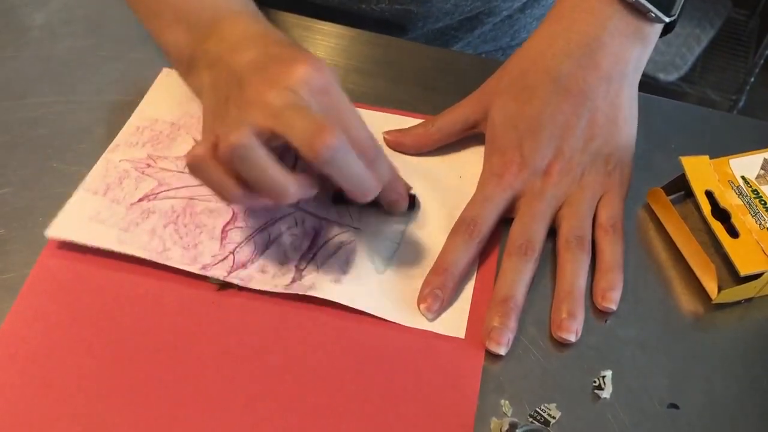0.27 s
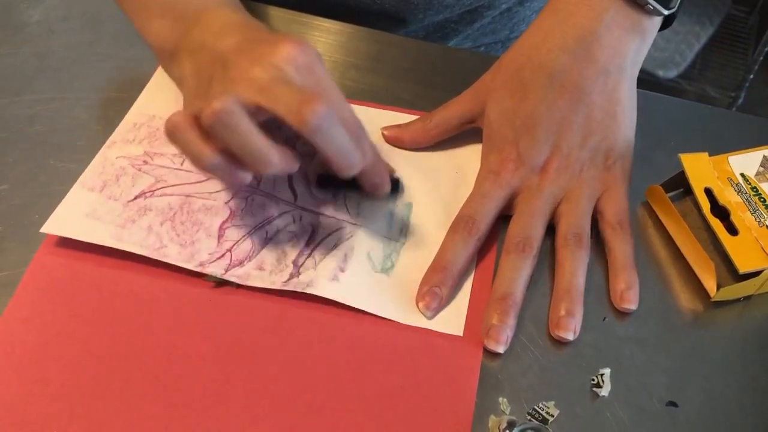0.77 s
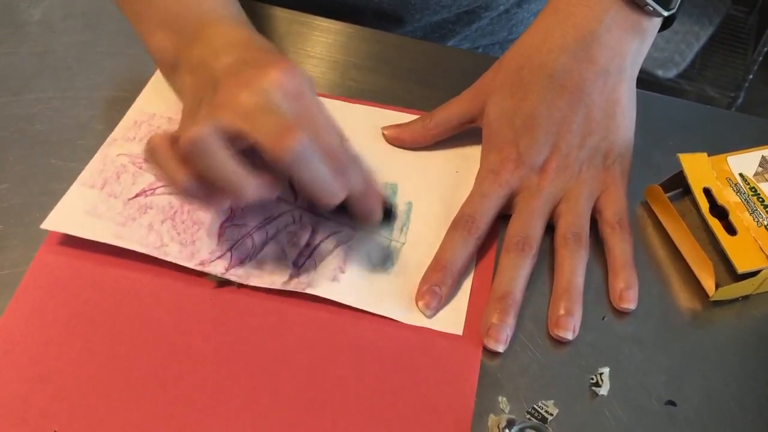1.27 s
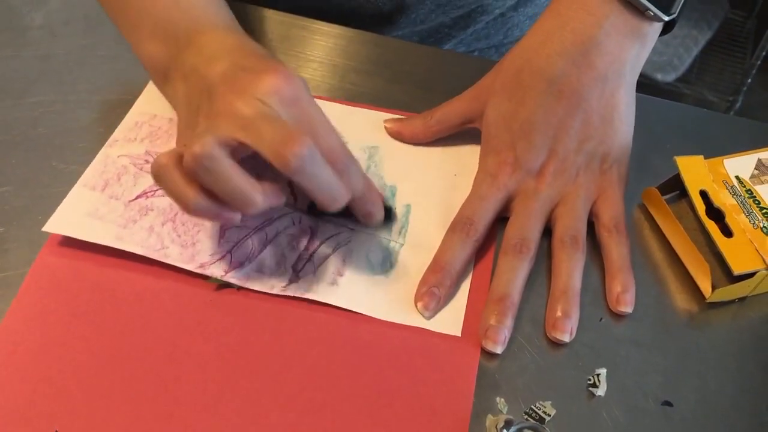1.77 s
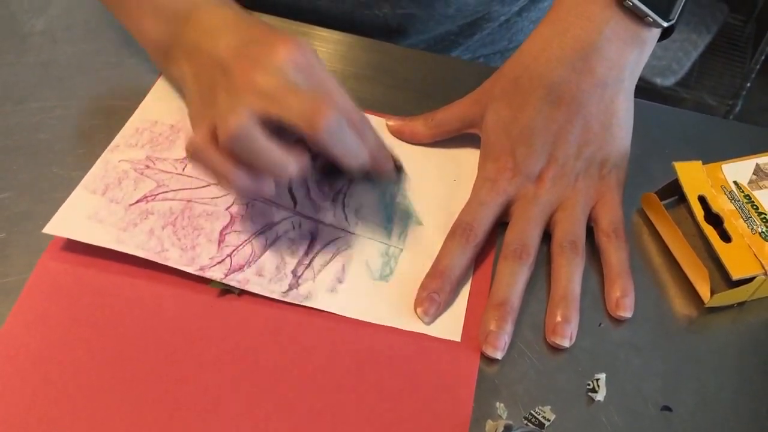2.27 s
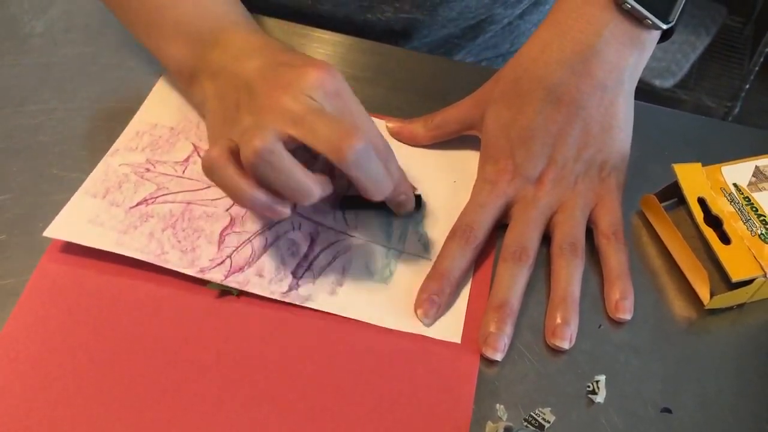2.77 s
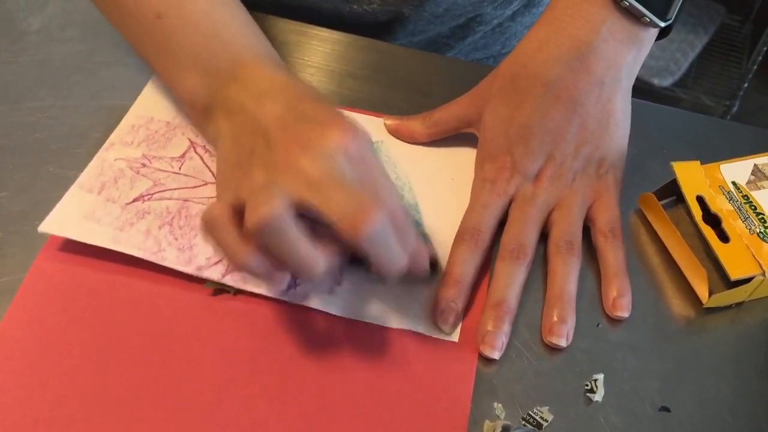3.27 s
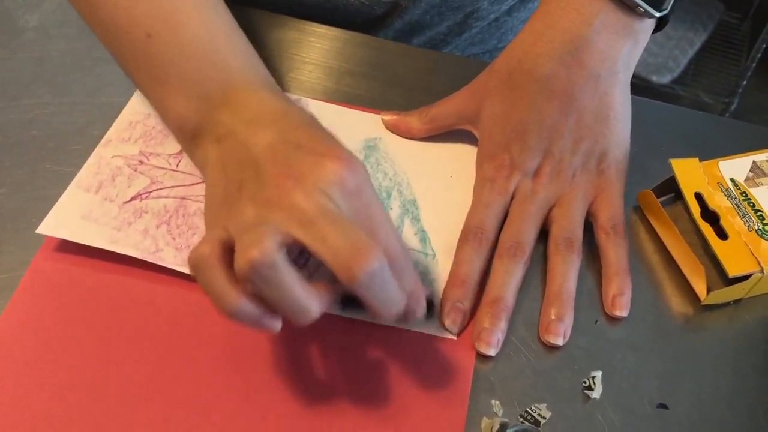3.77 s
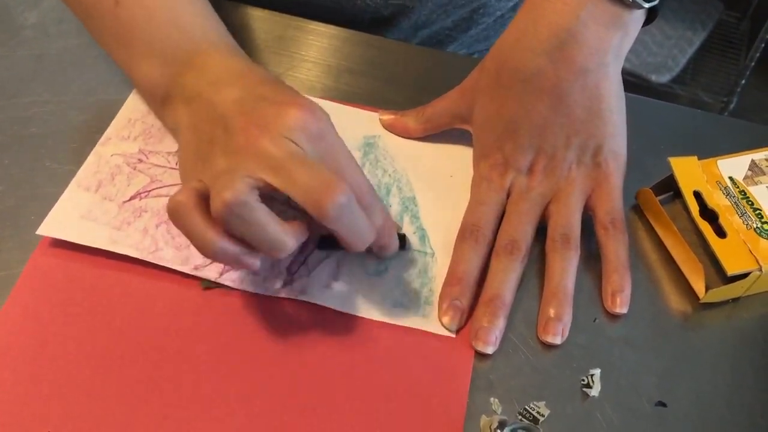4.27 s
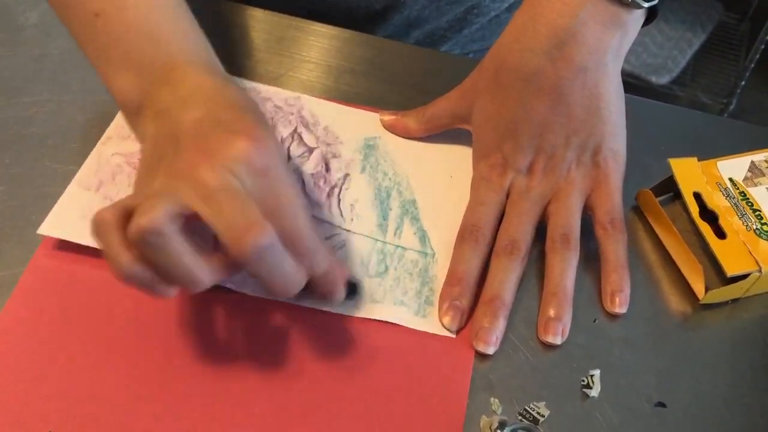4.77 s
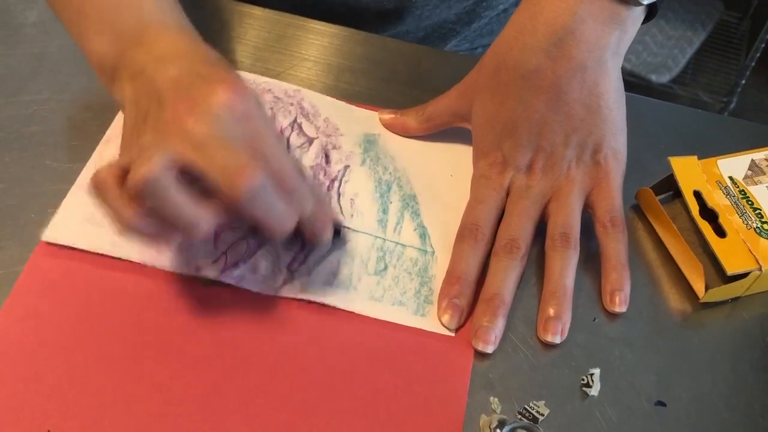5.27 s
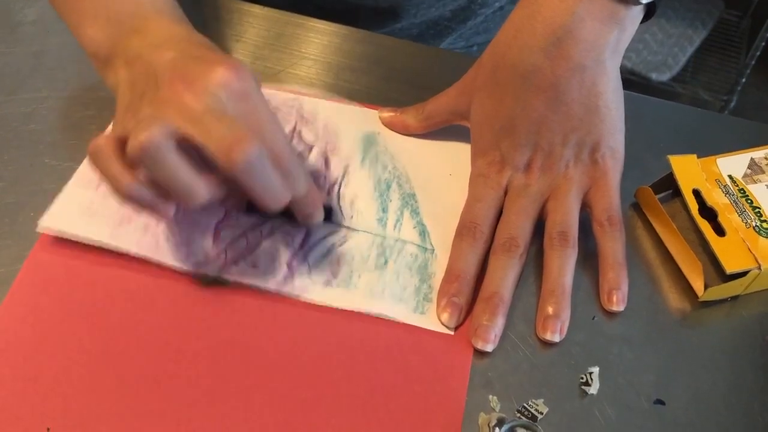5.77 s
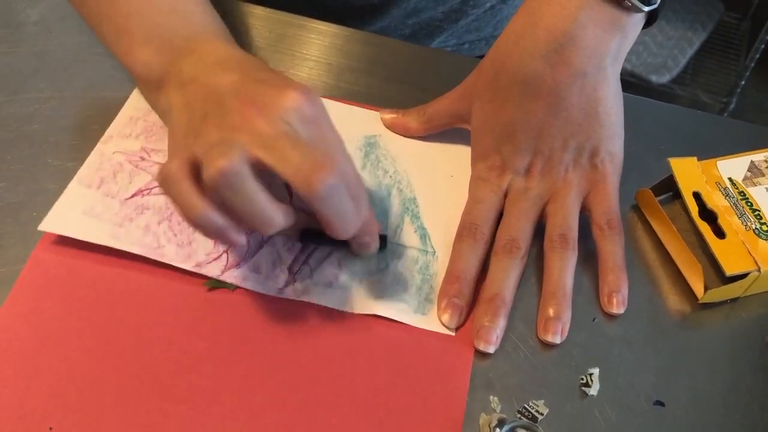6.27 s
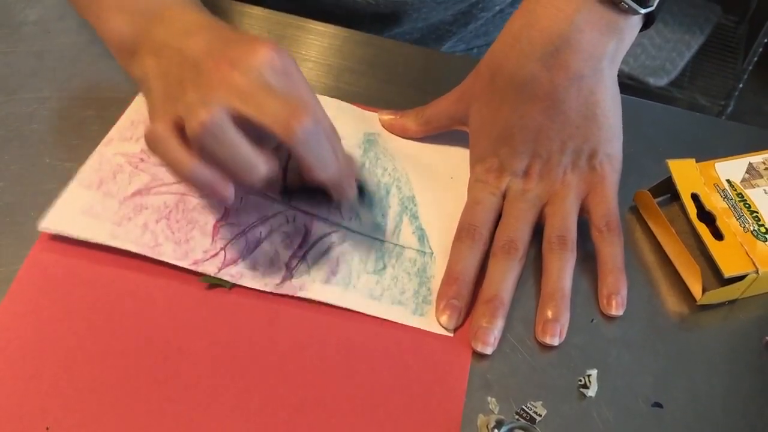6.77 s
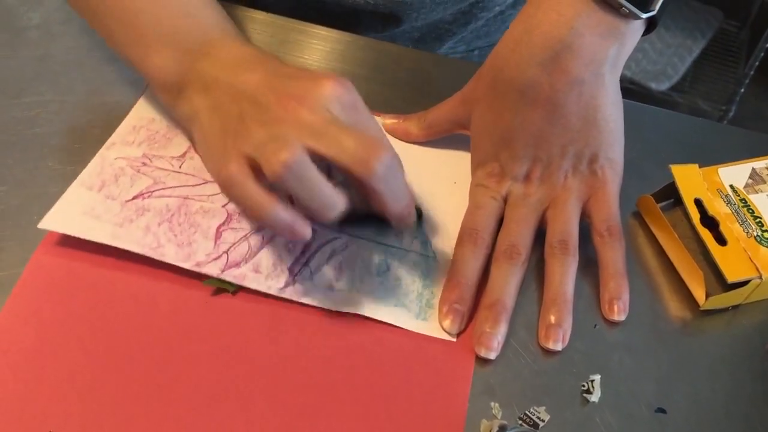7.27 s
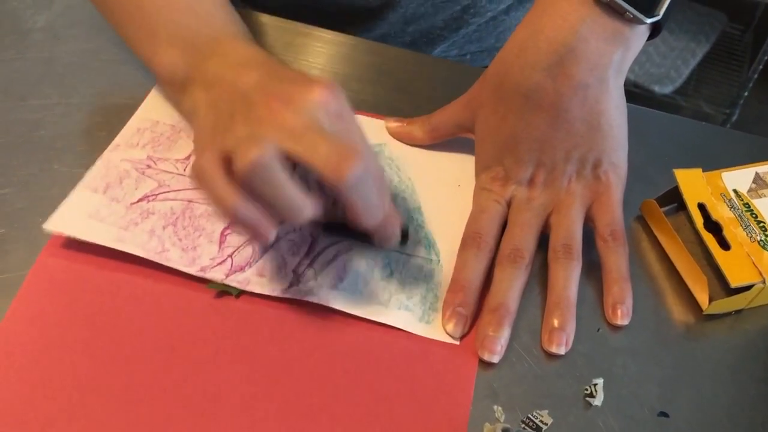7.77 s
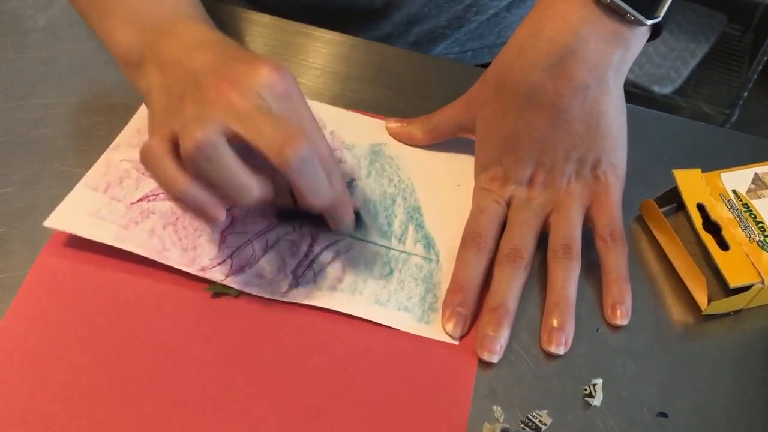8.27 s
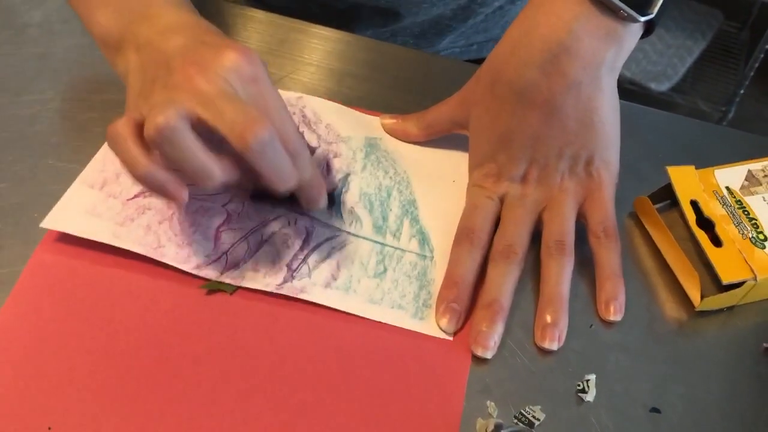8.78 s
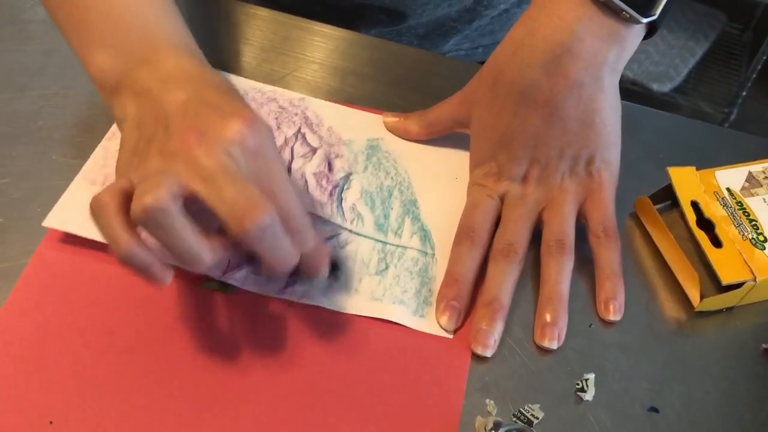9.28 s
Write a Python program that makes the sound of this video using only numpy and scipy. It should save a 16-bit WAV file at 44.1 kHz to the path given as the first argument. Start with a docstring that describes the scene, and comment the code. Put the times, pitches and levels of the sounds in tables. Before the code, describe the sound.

Close up in a small room, a wax crayon rubs rapidly to and fro over paper, about five dry, bright strokes a second. The first strokes are hardest, with hissing skids, sharp snaps and soft knocks of the sheet on the table. Rubbing then turns lighter and finer, firms up again midway, and continues to the end over a constant low electrical hum and faint ventilation rush.

```python
"""A small room with a table: a wax crayon rubs to and fro over a sheet of paper that lies on a leaf.
Fine noise grains through the sheet's colour make the rasp, skids, scuffs and rib ticks; sharp slips snap.
Decaying low modes make the knocks of the sheet on the table, and shaped noise the swish of the hand.
Behind it, wavering sines make a mains hum and fan tones, and coloured noise the low rush of the room."""
import sys
import numpy as np
from scipy import signal
from scipy.fft import rfft, irfft
from scipy.io import wavfile
from scipy.ndimage import uniform_filter1d

SR = 44100
rng = np.random.default_rng(int(sys.argv[2]) if len(sys.argv) > 2 else 0)


def transcribe(u):
    """Save the signal u as a 16-bit wav file named by the first command-line argument.

    u: samples, shape (n,) or (channels, n), limited to [-1, 1]; the rate is SR.
    q: integer samples, one column per channel.
    """
    v = np.clip(np.atleast_2d(u).T, -1, 1)
    q = np.round(v * 32767).astype(np.int16)
    wavfile.write(sys.argv[1], SR, q)


N = 420713
TIME = np.arange(N) / SR
USUAL_DB = -49  # pressure of a usual stroke
EDGE_HZ = 15850  # upper limit of the band


def amp(db):
    """Turns decibels into a gain."""
    return 10 ** (np.asarray(db) / 20)


def evened(x):
    """Scales to rms 1."""
    return x / np.sqrt(np.mean(x ** 2) + 1e-20)


def read(points, hz):
    """Reads a table on a logarithmic frequency axis."""
    f, value = np.transpose(points)
    return np.interp(np.log(hz + 1), np.log(f + 1), value)


def add(mix, s, sound):
    """Mixes a sound in at time s."""
    part = mix[max(round(s * SR), 0):][:len(sound)]
    part += sound[:len(part)]


def drift(hz, count):
    """Slow chance of rms 1 with changes up to about hz."""
    f = np.fft.rfftfreq(count, 1 / SR)
    noise = rfft(rng.standard_normal(count))
    return evened(irfft(noise / (1 + (f / hz) ** 4), count))


def grains(count, per_s, spread_db):
    """Tiny slips of wax on fibres, at random instants; a wider spread makes a few much larger."""
    sizes = amp(spread_db * np.minimum(rng.exponential(1, count), 4.5))
    signed = sizes * rng.standard_normal(count)
    return signed * (rng.random(count) < per_s / SR)


# how a lift of the body or the sheen spreads over the spectrum: [f/Hz, share of the lift]
BODY_LIFT = [(1200, 1.9), (2600, 0.57), (3700, 1.5), (4600, 0), (6000, 0)]
SHEEN_LIFT = [(6500, 0), (11000, 1.06), (15500, 1.03)]


def ring(spectrum, body_db=0, sheen_db=0, size=2048):
    """Causal response of the paper to one click, of energy 1 before body and sheen are lifted."""
    hz = abs(np.fft.fftfreq(size, 1 / SR))
    lift_db = body_db * read(BODY_LIFT, hz) + sheen_db * read(SHEEN_LIFT, hz)
    log_gain = np.log(evened(amp(read(spectrum, hz))) * amp(lift_db))
    minimum_phase = np.exp(np.conj(signal.hilbert(log_gain)))
    return np.fft.ifft(minimum_phase).real[:size // 2]


# colour of the rush of ventilation: [f/Hz, relative level/dB per Hz]
AIR_COLOUR = [(25, -33), (45, -20), (60, -3), (72, -11), (92, 0), (112, -15), (140, -4), (172, 5),
              (205, -4.5), (235, -1), (330, -9.5), (450, -10.5), (700, -13.5), (1400, -20.5), (2200, -23.5),
              (2800, -31.5), (3800, -28.5), (7000, -34.5), (15500, -39)]
# mains hum and fan tones: [f/Hz, rms level/dB before the waver]
HUM_TONES = [(119.9, -51), (175, -80), (233, -68.5), (359.7, -74.5), (407, -78), (443, -77.5), (462, -75),
             (599.6, -78)]


def background(air_db=-57.5, waver_db=0.4, fan_waver=1.0):
    """A mains hum steady in pitch; weaker tones and a swelling fan drone wander in the rush of ventilation."""
    drone_hz, drone_db = 59, -75
    swell_db, swell_s, first_crest_s = 5.5, 3.08, 1.54
    hz = np.fft.rfftfreq(N, 1 / SR)
    rush = irfft(rfft(rng.standard_normal(N)) * amp(read(AIR_COLOUR, hz)), N)
    out = amp(air_db) * evened(rush)
    sway, wander = drift(3.5, N), drift(1.13, N)
    strongest_db = max(db for _, db in HUM_TONES)
    for f, db in HUM_TONES:
        shift = rng.integers(N)  # each tone wavers on its own
        phase = 2 * np.pi * (f * TIME + rng.random())
        phase += fan_waver * np.roll(wander, shift) * (db < strongest_db)  # the strongest holds its pitch
        out += np.sqrt(2) * amp(db + waver_db * np.roll(sway, shift)) * np.sin(phase)
    swell = amp(drone_db + swell_db * np.cos(2 * np.pi * (TIME - first_crest_s) / swell_s))
    drone = np.sin(2 * np.pi * drone_hz * TIME + fan_waver * wander)
    return out + np.sqrt(2) * swell * drone


# the wax breaks loose and skids: [t/s start, length/s before the release, level/dB of the grains before shaping]
SKIDS = [(0, 0.07, -65.5), (0.208, 0.038, -42), (0.336, .02, -40), (0.359, 0.041, -33), (0.387, 0.021, -30),
         (0.628, 0.0083, -38.5), (0.867, 0.015, -38.5), (1.613, 0.031, -48), (2.54, 0.062, -42.5),
         (2.882, 0.043, -44.5), (3.111, 0.016, -45.5), (3.2335, 0.0075, -29), (5.389, 0.01, -45.5),
         (5.782, 0.0093, -43), (7.009, 0.031, -50.5), (7.292, 0.042, -48), (7.751, 0.022, -49),
         (8.135, 0.045, -47)]
# bright colour of a skid, which barely moves the sheet: [f/Hz, relative level/dB per Hz]
SKID_COLOUR = [(150, -30), (1500, -19), (3000, -13), (4400, -8), (5200, 3.5), (6800, 5.5), (8400, -2),
               (11000, 2), (15500, -8)]


def skids(attack_s=.0012, release_s=0.0085):
    """Sudden runs of fine, fast slips that hiss brightly."""
    out, hiss = np.zeros(N), ring(SKID_COLOUR)
    for s, length_s, db in SKIDS:
        t = np.arange(0, length_s + 2 * release_s, 1 / SR)
        shape = np.interp(t, [0, attack_s, length_s, t[-1]], [0, 0.84, 0.5, 0.0])
        slips = grains(len(t), per_s=6800, spread_db=4.0) * shape
        add(out, s, amp(db) * signal.fftconvolve(slips, hiss))
    return out


# strokes, to and fro in turn, each lasting until the next:
# [t/s start before the rest, pressure as level/dB, place of the peak 0-1 before limits, sheen as level/dB]
STROKES = [(0.094, -45, 0.55, 3.0), (0.293, -39, 0.25, -4), (0.523, -51, 0.41, 0), (0.749, -42.5, 0.49, -1),
           (0.948, -52, 0.41, 1), (1.163, -45.5, 0.41, -2.5), (1.354, -55, 0.29, 5.5),
           (1.537, -50, 0.81, 3), (1.749, -60.5, 0.37, 2.5), (1.947, -49.5, 0.79, 2.5),
           (2.146, -60, 0.4, 2), (2.368, -47.5, 0.97, 2), (2.654, -53.5, 0.11, -0.5),
           (2.811, -53.5, 0.52, 2.0), (3.01, -53, 0.7, 2.5), (3.173, -52.5, 0.33, 6.0),
           (3.392, -60.5, 0.88, 2.5), (3.554, -57.5, 0.41, 10.5), (3.724, -63.5, 0.8, 4),
           (3.919, -59.5, 0.5, 10.5), (4.079, -57, 0.82, 1), (4.265, -57, 0.5, 7.5),
           (4.431, -48.5, 0.88, -0.5), (4.638, -49, 0.24, 5.5), (4.814, -55, 0.63, 0.5),
           (4.991, -52, 0.3, 3), (5.16, -49.5, 0.78, -4), (5.353, -46.5, 0.29, 1.5), (5.534, -52, 0.56, -6),
           (5.753, -53, 0.26, -0.5), (5.921, -55.5, 0.24, 1), (6.099, -49, 0.38, -1.5),
           (6.283, -50, 0.3, 1), (6.461, -45.5, 0.45, -0.5), (6.679, -52, 0.21, -1.5),
           (6.878, -53.5, 0.41, -3.5), (7.12, -57.5, 0.06, 3), (7.24, -52, 0.57, 0.5),
           (7.392, -55.5, 0.35, 0.0), (7.621, -51.5, 0.74, 1), (7.815, -56.5, 0.35, 2),
           (8.04, -50, 0.61, 1.5), (8.235, -54, 0.38, 0.5), (8.451, -50.0, 0.62, -0.5),
           (8.68, -51.5, 0.43, -6), (8.832, -52.5, 0.34, 1.5), (9.07, -57, 0.6, 2.5),
           (9.222, -58, 0.33, 5.5), (9.371, -51, 0.9, -4)]


def strokes():
    """Yields each stroke: start, pressure in dB over time, and motion (0 at the turns, 1 between)."""
    rise_db, fall_db, arch_power = 21, 26.5, 1.606  # slopes of a usual stroke's rounded arch
    peaking = 0.5  # strokes harder than usual swell more steeply
    # the hand rests longer before a late peak; the wax grips at once and slows into the turn
    rest_s, grip_s, turn_s = 0.043, 0.0077, 0.044
    ends = [row[0] for row in STROKES[1:]] + [N / SR + grip_s]
    for (start, db, peak, _), end in zip(STROKES, ends):
        peak = np.clip(peak, .05, .95)
        start += rest_s * peak ** 2
        t = np.arange(0, end - start, 1 / SR)
        past = t / t[-1] - peak
        slope_db = np.where(past < 0, rise_db / peak ** arch_power, fall_db)
        slack_db = slope_db * abs(past) ** arch_power
        moving = np.clip(np.minimum(t / grip_s, (t[-1] - t) / turn_s), 0, 1)
        yield start, db - slack_db * amp(peaking * (db - USUAL_DB)), moving


# colour of the paper's tooth under the wax: [f/Hz, relative level/dB per Hz]
RASP_COLOUR = [(150, -11.5), (500, -15.5), (1100, -18), (1650, -9), (1880, -7.5), (2500, -6), (3600, -1),
               (4400, -2), (5100, 2), (5700, -1.5), (6300, 1.5), (8400, -4), (10900, -4), (13000, -7),
               (15500, -7)]


def rubbing(chatter_db=2.1, chatter_hz=120, uneven_db=0.75, uneven_hz=25, grit_db=-15,
            treble_follow=0.02, body_db=1.0, light_body=0.11, level_db=-0.34):
    """The tooth of the paper rasps under the wax; light strokes have more body, and treble follows pressure."""
    out = np.zeros(N)
    treble = signal.butter(1, 8000, "high", fs=SR)
    for (start, force_db, moving), (_, peak_db, _, sheen_db) in zip(strokes(), STROKES):
        count = len(force_db)
        slips = grains(count, per_s=30000, spread_db=2.3) * amp(chatter_db * drift(chatter_hz, count))
        slips += amp(grit_db) * grains(count, per_s=360, spread_db=-3.0)  # crumbs of wax catch now and then
        sheet = ring(RASP_COLOUR, body_db + light_body * (USUAL_DB - peak_db), sheen_db)
        rasp = signal.fftconvolve(slips, sheet)[:count]
        treble_change = amp(treble_follow * (force_db - peak_db)) - 1
        rasp = rasp + treble_change * signal.lfilter(*treble, rasp)
        uneven = uneven_db * drift(uneven_hz, count)
        add(out, start, rasp * moving * amp(force_db + level_db + uneven))
    return out


# the side of the hand bears down on the sheet: [t/s centre, level/dB before the trim, half length/s]
BRUSHES = [(1.48, -62, 0.027), (1.886, -61, 0.026), (2.273, -61.5, 0.034), (2.487, -65, 0.066),
           (2.743, -58.5, .015), (3.606, -64.5, 0.027), (3.966, -61.5, 0.01), (5.27, -60, 0.024),
           (6.245, -57, 0.012), (9.193, -57, 0.011), (9.253, -58, 0.0098)]


def brushes(glide_db=-69, narrow=3.2, trim_db=-1):
    """Skin slides on paper with a dull swish: lightly in mid-stroke, louder where the hand bears down."""
    force = sum(amp(db) * np.exp(-((TIME - s) / half_s) ** 2 / 2) for s, db, half_s in BRUSHES)
    for start, _, moving in strokes():
        glide = abs(np.sin(np.linspace(0, np.pi, len(moving)))) ** narrow
        add(force, start, amp(glide_db) * glide)
    skin = ring([(200, -10), (700, -1.5), (1300, 8.5), (2100, -0.5), (3000, -4.0), (8000, -8)])
    return amp(trim_db) * signal.oaconvolve(force * rng.standard_normal(N), skin)[:N]


def ribs(per_s=60, spread_db=-0.5, follow=0.64, dull_db=-68, sharp_db=-64):
    """The fine ribs of the leaf pass at random under the moving crayon, each a small hollow tick."""
    force = np.zeros(N)
    for start, force_db, moving in strokes():
        add(force, start, moving * amp(follow * (force_db - USUAL_DB)))
    tick = amp(dull_db) * ring(SCUFF_COLOUR) + amp(sharp_db) * ring(SNAP_COLOUR)
    return signal.oaconvolve(force * grains(N, per_s, spread_db), tick)[:N]


# the crayon crosses a vein and the loose sheet rattles: [t/s centre, level/dB before the trim, half length/s]
SCUFFS = [(0.215, -51, 0.011), (0.3724, -39, 0.00144), (0.422, -43.5, 0.0058), (0.633, -50, 0.0088),
          (0.854, -43, 0.0036), (.908, -46, 0.0035), (1.015, -41.5, 0.0025), (1.043, -45, 0.0089),
          (2.574, -49, 0.0039), (2.646, -50, 0.0018), (2.693, -53, 0.0043), (2.911, -42.5, 0.0023),
          (2.931, -52, 0.0048), (3.099, -56, 0.0072), (3.272, -45.5, 0.0072), (4.227, -48, 0.0031),
          (4.304, -48.5, 0.0023), (4.701, -49.5, 0.0095), (5.068, -53.5, 0.0027), (5.416, -47, 0.0046),
          (5.795, -48, 0.0056), (5.995, -52, 0.0034), (6.348, -49.5, .009), (6.604, -39.5, 0.0017),
          (6.681, -52.5, 0.0028), (6.734, -48.5, .011), (7.123, -51, 0.0037), (7.347, -45.5, 0.0021),
          (7.456, -58, 0.005), (8.569, -60, 0.0043), (8.623, -51, 0.004), (8.758, -48, 0.0041),
          (8.912, -43.5, 0.0026), (8.933, -52.5, 0.0051)]
# hollow colour of the loose sheet: [f/Hz, relative level/dB per Hz]
SCUFF_COLOUR = [(100, -28), (300, -1.5), (600, -3), (1000, -2), (1500, -3.5), (2000, -2), (3200, -4.5),
                (6000, -8.5), (15000, -64)]


def scuffs(trim_db=2.5):
    """Short clumps of coarse slips with the hollow colour of the loose sheet."""
    out = np.zeros(N)
    for s, db, half_s in SCUFFS:
        t = np.arange(-2 * half_s, 2 * half_s, 1 / SR)
        slips = evened(grains(len(t), per_s=7000, spread_db=2.5))
        clump = slips * np.exp(-(t / half_s) ** 2 / 2)
        add(out, s + t[0], amp(db + trim_db) * signal.fftconvolve(clump, ring(SCUFF_COLOUR)))
    return out


# the sheet is knocked down on the table: [t/s, peak level/dB, lift of the lowest modes as level/dB]
THUDS = [(.206, -43, 0), (0.426, -32.5, -7), (0.634, -38, -8), (.911, -37.5, -1), (1.039, -41.5, -1),
         (2.943, -43.5, 5), (3.276, -37, 4), (3.119, -46, -1), (4.307, -39.5, 2), (4.707, -39, 5),
         (5.031, -48, 16), (5.300, -47, 10), (5.421, -36, 1), (5.81, -51, 18), (6.341, -41.5, -17),
         (8.945, -40.5, 2)]
# modes of the sheet on the table: [f/Hz before detuning, relative level/dB, t60/s]
TABLE_MODES = [(87, -24, 0.35), (168, -17.5, 0.19), (186.3, -17, 0.12), (208.3, -5.5, 0.047),
               (274, -17.5, 0.069), (443, -19.5, 0.047)]


def thuds(stiffen=2.08, settle_s=0.001, scatter=0.068):
    """Low modes ring; bending waves bring the higher pitch first, so each thud falls quickly."""
    out, t = np.zeros(N), np.arange(SR // 3) / SR
    warped = t + stiffen * settle_s * (1 - np.exp(-t / settle_s))
    hz, mode_db, t60 = np.transpose(TABLE_MODES)[:, :, None]
    boom_share = read([(90, 1), (165, 0.91), (215, 0)], hz)
    for s, db, boom_db in THUDS:
        detune = 1 + scatter * rng.standard_normal(hz.shape)  # the hand holds the sheet differently each time
        strength = amp(mode_db + boom_db * boom_share)
        decay = np.exp(-np.log(1000) * t / t60)
        modes = strength * decay * np.sin(2 * np.pi * hz * detune * warped)
        thud = modes.sum(0) * (1 - np.exp(-t / 0.0064))  # soft onset
        add(out, s, amp(db) * thud / abs(thud).max())
    return out


# the wax snaps over a ridge: [t/s, energy as level/dB, sheen as level/dB]
SNAPS = [(0.37, -8, 0.8), (0.4158, -16, -4), (0.423, -6.5, -2), (0.8545, -12.5, -4), (0.9056, -15.5, -3),
         (1.0103, -2, 2.5), (1.332, -35, 17), (2.062, -21, 14), (2.1636, -32, 18), (2.5988, -1, -2.5),
         (2.6125, -19, -20), (2.623, -22, -17), (2.7185, -19, 8), (2.9091, -12, -8), (2.923, -6.5, 4.5),
         (3.235, -18, 12), (3.2642, -16, -0.7), (3.271, -7, 8), (4.3018, -27, 9), (4.592, -17, 1),
         (4.6917, -16.5, -7), (4.705, -9.5, -2), (5.418, -19, -21), (5.9921, -15.5, -11), (6.1713, -23, 6),
         (6.2544, -25, -3), (6.6039, -5.5, -3), (6.6756, -15, -10), (7.1137, -11.5, -4), (7.124, -13, 5),
         (7.4073, -23.5, 12), (8.2446, -31, 7), (8.6193, -18.5, -13), (8.7517, -15.5, 2.5),
         (8.9083, -19, -20), (8.939, -17.5, -19), (9.0066, -25, 7), (9.327, -25.5, 18)]
# colour of a snap: [f/Hz, relative level/dB per Hz]
SNAP_COLOUR = [(150, -3), (700, -29.5), (1900, -12.5), (3400, -2), (4300, -1), (6200, 3), (9000, -3.5),
               (12000, -7.5), (16000, -17)]


def snaps(flutter=0.43, flutter_s=0.00092, dull_body=0.23):
    """One sharp slip, then a millisecond of waves running to and fro in the sheet."""
    unstick_share, unstick_db, unstick_sheen_db = 0.3, -41, 10
    out, t = np.zeros(N), np.arange(SR // 100) / SR
    # at some turns the wax comes unstuck with a tiny tick
    ticks = [(row[0], unstick_db, unstick_sheen_db) for row in STROKES[1:]]
    heard = np.r_[np.ones(len(SNAPS)), rng.random(len(ticks)) < unstick_share]
    for (s, db, sheen_db), on in zip(SNAPS + ticks, heard):
        slip = (t == 0) + flutter * rng.standard_normal(len(t)) * np.exp(-t / flutter_s)
        body_db = dull_body * max(-sheen_db, 0)  # dull snaps move more of the sheet
        snap = signal.fftconvolve(slip, ring(SNAP_COLOUR, body_db, sheen_db))
        add(out, s, on * amp(db) * snap / np.linalg.norm(snap))
    return out


def travel(x, patch_db=2, size=12):
    """As the contact travels it excites other resonances of the sheet, so the colour shifts in patches."""
    z = signal.stft(x, SR, nperseg=256)[2]
    patches = rng.standard_normal(z.shape)
    for _ in range(2):
        patches = uniform_filter1d(patches, size, axis=1)  # along time
        patches = uniform_filter1d(patches, size=4, axis=0)  # along frequency
    return signal.istft(z * amp(patch_db * evened(patches)), SR, nperseg=256)[1][:N]


# decay of the room: [f/Hz, t60/s]
ROOM_DECAY = [(150, 0.62), (1000, 0.39), (4000, 0.38), (8000, 0.15), (15000, 0.061)]


def room(x, wet_db=-13, near_db=-17, count=8):
    """Near echoes from table and hands, then a faint tail that dies band by band."""
    hz, t, z = signal.stft(rng.standard_normal(SR // 2), SR, nperseg=256)
    decay = np.exp(-np.log(1000) * t / read(ROOM_DECAY, hz)[:, None])
    colour = amp(read([(200, 9), (4000, -5.0), (7000, -1), (14000, -1.5)], hz))[:, None]
    tail = signal.istft(z * decay * colour, SR, nperseg=256)[1]
    response = amp(wet_db) * tail / np.linalg.norm(tail)
    echoes = (rng.uniform(.0006, 0.0093, count) * SR).astype(int)
    response[echoes] += amp(near_db) * rng.choice([-1, 1], count) / np.sqrt(count)
    response[0] += 1  # direct sound
    return signal.fftconvolve(x, response)[:N]


def scene(low_hz=110):
    """Crayon, hand and paper in the room, over the hum; the thin sheet radiates no deep bass."""
    behind = background()
    paper = travel(skids() + rubbing() + brushes() + ribs() + scuffs()) + snaps()
    paper = signal.lfilter(*signal.butter(2, low_hz, "high", fs=SR), paper)
    return (behind + room(paper) + thuds())[None]


def record(dry):
    """A steep lowpass limits the band at the top."""
    lowpass = signal.firwin(511, EDGE_HZ, window=("kaiser", 9), fs=SR)
    return signal.oaconvolve(dry, lowpass[None], "same")


dry = scene()
out = record(dry)
transcribe(out)
```